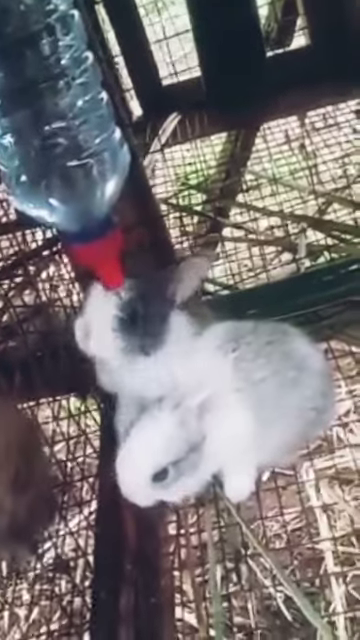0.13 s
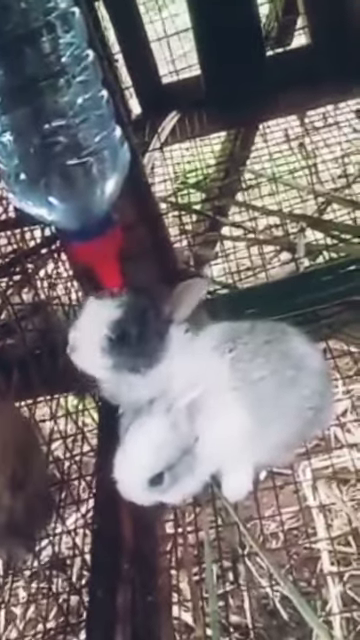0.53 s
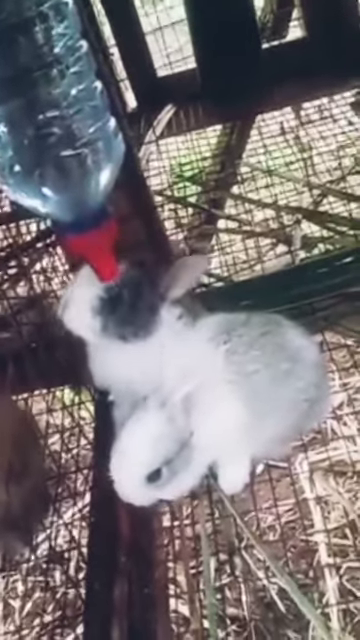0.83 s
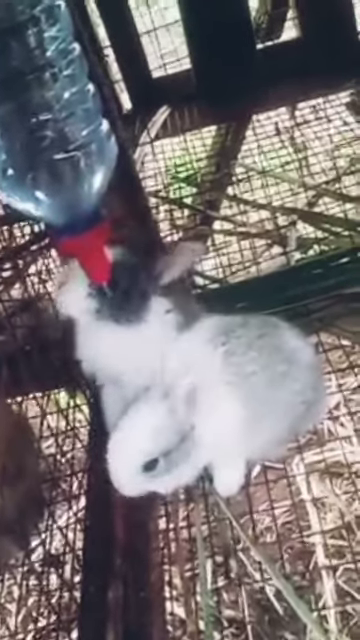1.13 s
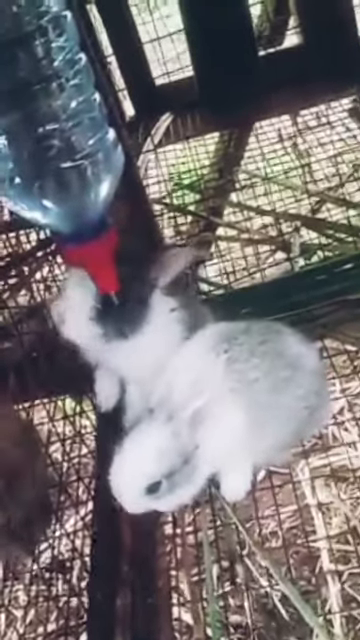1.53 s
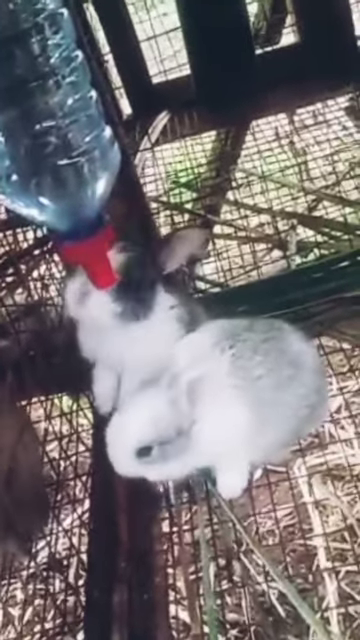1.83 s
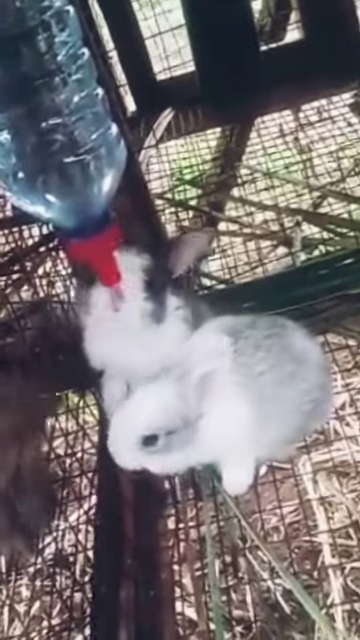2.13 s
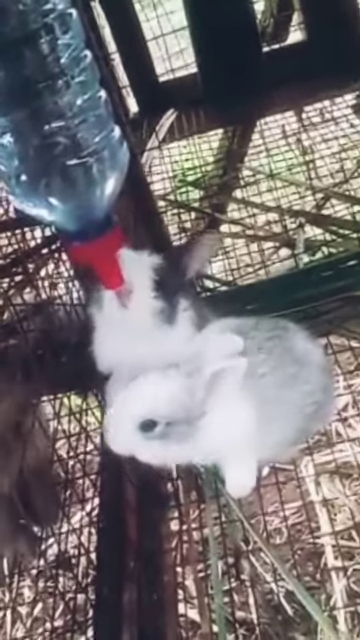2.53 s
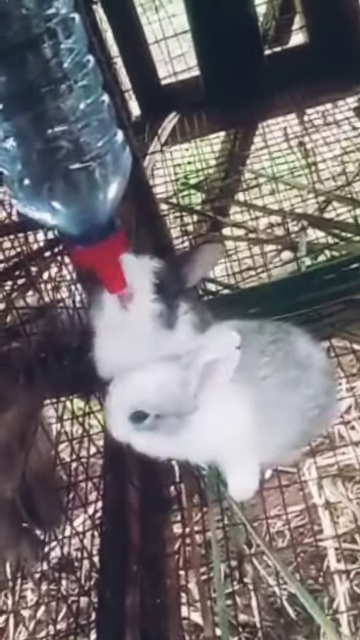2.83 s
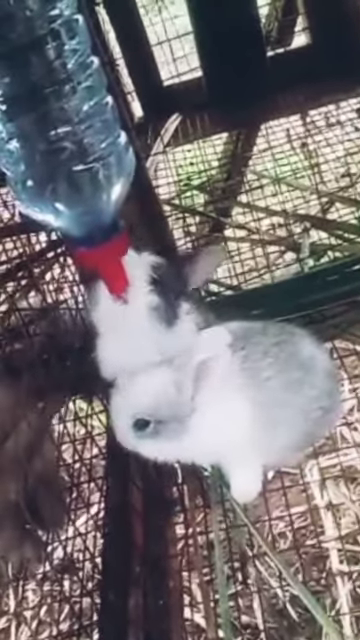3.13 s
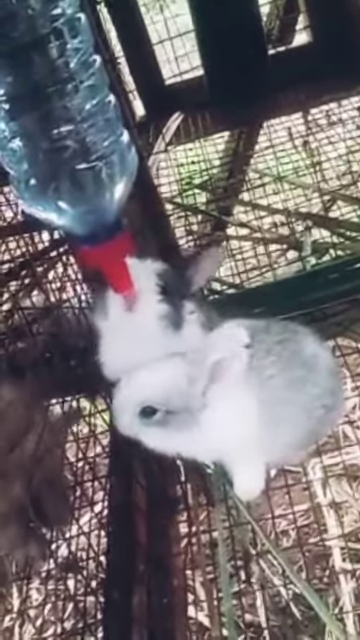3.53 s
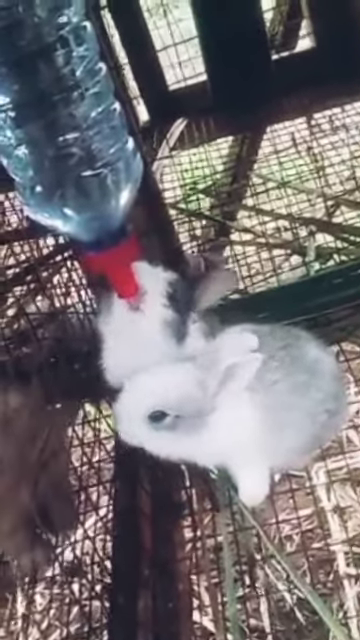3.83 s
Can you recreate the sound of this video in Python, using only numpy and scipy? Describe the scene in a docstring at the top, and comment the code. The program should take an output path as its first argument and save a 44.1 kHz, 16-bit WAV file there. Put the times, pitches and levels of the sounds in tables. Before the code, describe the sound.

A water bottle's metal ball valve clicks and rattles from start to finish as a rabbit licks it about five times a second, close by in a hutch. Each lick carries a soft wet smack and a slight plastic bottle ring. Faint gurgles cluster between 0.5 and 1.7 seconds, and tiny bubbles pop from about 2.3 seconds. A very faint low hum and outdoor air lie underneath.

```python
"""Rabbits at a water bottle

Young rabbits lick the metal nozzle of a water bottle in a wire hutch, about five licks a second.
The ball valve clicks and rattles in its tube, the wet tongue crackles and smacks, air gurgles into
the neck and the plastic bottle rings softly. Behind it lie a low electric hum and faint outdoor air."""
import sys
import numpy as np
from scipy import signal
from scipy.fft import rfft, irfft
from scipy.io import wavfile

SR = 44100
rng = np.random.default_rng(int(sys.argv[2]) if len(sys.argv) > 2 else 0)


def unload_wav(signal):
    """Save mono or channel-first audio to the path in sys.argv[1] as 16-bit WAV at rate SR, clipped to [-1, 1]."""
    wavfile.write(
        sys.argv[1],
        SR,
        np.round(np.clip(np.atleast_2d(signal).T, -1, 1) * 32767).astype(np.int16),
    )


N = 176400
HIT_GAIN = np.sqrt(.002 * SR)  # gives a unit-energy hit the energy of 2 ms at full level


def undb(db):
    """Decibels to gain."""
    return 10 ** (np.asarray(db) / 20)


def unit(x):
    """Scale a response to unit energy."""
    return x / np.sqrt(np.sum(x ** 2))


def through(x, response):
    """Play a sound through a response."""
    return signal.fftconvolve(x, response)[:N]


def add(out, s, sound):
    """Mix a sound in at s seconds."""
    i = int(np.clip(s * SR, 0, N - 1))
    out[i:i + len(sound)] += sound[:N - i]


def swell(s, rise, fall):
    """Envelope that builds to a peak at s seconds and dies away."""
    t = np.arange(N) / SR - s
    return np.exp(-np.where(t < 0, -t / rise, t / fall) ** 1.185)


def colour(eq, shift=1, size=512):
    """Response of an EQ curve, its pitch scaled by shift, with the lows rolled off."""
    hz, db = np.array(eq).T
    f = np.maximum(np.arange(size // 2 + 1), .5) * SR / size
    gain = undb(np.interp(np.log(f), np.log(hz * shift), db))
    low_cut = np.minimum(f / hz[0], 1) ** 2
    cepstrum = irfft(np.log(gain * low_cut))
    cepstrum[1:size // 2] *= 2  # minimum phase keeps the attack sharp
    cepstrum[size // 2 + 1:] = 0
    return unit(irfft(np.exp(rfft(cepstrum))))


def varied(eq, detune=.015, treble_db=3, timbre_db=1.5):
    """One contact's response: pitch, brightness and the balance of resonances all scatter."""
    hz, db = np.array(eq).T
    treble = (hz > 10000) * treble_db * rng.uniform(-1, 1)
    db = db + treble + timbre_db * rng.standard_normal(len(db))
    return colour(np.column_stack([hz, db]), shift=np.exp(detune * rng.standard_normal()))


def crackle(envelope, eq, per_s, spread_db, detune=.015, colours=6):
    """Random tiny impacts of uneven size and colour under an envelope."""
    size = undb(spread_db * np.minimum(rng.exponential(size=N), 2.5))
    hits = (rng.random(N) < per_s / SR) * rng.choice([-1, 1], N) * size
    hits = envelope * hits / np.std(hits)
    kind = rng.integers(colours, size=N)
    return sum(through(hits * (kind == k), varied(eq, detune)) for k in range(colours))


# Partials of the electric hum (frequency [Hz], level [dB])
HUM_PARTIALS = [(59.4,-61),(119.6,-71.5),(178.5,-82.5)]
# Dark tone of the outdoor air (frequency [Hz], gain [dB])
AIR_EQ = [(36,9),(60,1.5),(105,4.5),(160,-2),(300,-8),(600,-5.5),(800,-8.5),(1150,-6.5),(2000,-13.5),(4500,-21),(8700,-23),(16000,-30)]
def background(air_db=-64):
    """The bed: a low electric hum, wavering slightly in pitch, in soft outdoor air."""
    t = np.arange(N) / SR
    waver = np.interp(t, np.linspace(0, t[-1], 16), rng.standard_normal(16))
    clock = np.cumsum(1 + 0.0058 * waver) / SR
    hum = sum(undb(db) * np.sqrt(2) * np.sin(2 * np.pi * (hz * clock + rng.random()))
              for hz, db in HUM_PARTIALS)
    return hum + undb(air_db) * through(rng.standard_normal(N), colour(AIR_EQ, size=8192))


def hutch(x):
    """Quick reflections from bottle and boards, then a faint longer tail."""
    t = np.arange(SR // 3) / SR
    tail = lambda t60: unit(rng.standard_normal(len(t)) * (t > .001) * undb(-60 * t / t60))
    return x + through(x, undb(-11) * tail(t60=.028) + undb(-27) * tail(t60=.28))


# Soft body bumps (time [s], level [dB])
BUMP_CUES = [(.30,-58),(1.345,-60.5),(3.618,-54.5)]
# Muffled tone of a bump (frequency [Hz], gain [dB])
BUMP_EQ = [(170,-3.5),(280,3.5),(450,-17),(1000,-9.5),(4000,-45)]
def bumps():
    """A dull bump now and then as a rabbit shifts its weight."""
    push = sum(undb(db) * swell(s, rise=0.017, fall=0.014) for s, db in BUMP_CUES)
    return through(push * rng.standard_normal(N), colour(BUMP_EQ))


# Small mouth ticks (time [s], level [dB])
TICK_CUES = [(.042,-58),(.24,-59.5),(.847,-56),(.952,-50.5),(1.071,-56.5),(1.266,-57),(1.479,-59),(1.695,-58.5),(1.911,-60),(3.535,-59)]
# Dry tone of a tick (frequency [Hz], gain [dB])
TICK_EQ = [(300,-28),(900,-9.5),(1900,-7.5),(3500,-16.5),(6000,-12.5),(9000,-9),(13000,-10),(16000,-13)]
def mouth_ticks(trim_db=16, stray_count=30):
    """Single dry ticks as the mouth opens and closes, and fainter ones at random."""
    out = np.zeros(N)
    strays = [(when * N / SR, -70 + 6 * size) for when, size in rng.random((stray_count, 2))]
    for s, db in list(TICK_CUES) + strays:
        add(out, s, undb(db + trim_db) * HIT_GAIN * varied(TICK_EQ))
    return out


def bubble(db, hz, cycles=4.2, glide=0.019):
    """A bubble rings for a few cycles and rises a little in pitch."""
    age = np.arange(SR // 40) / SR * hz / cycles
    phase = 2 * np.pi * np.cumsum(hz * (1 + glide * np.tanh(age - 1))) / SR
    return undb(db) * 2 * age * np.exp(1 - 2 * age) * np.sin(phase)


GURGLE_SPREAD_S = .011
# Gulps of air entering the bottle (time [s], level [dB], centre pitch [Hz])
GURGLE_CUES = [(0.061,-60,1480),(0.498,-56.5,960),(0.595,-51,1090),(0.674,-51.5,1330),(.798,-54,1170),(0.996,-52,1194),(1.108,-49,1350),
               (1.439,-55,1150),(1.638,-52.5,1380),(2.757,-47,1150),(3.515,-50.5,1500)]
def gurgles(count=7, octaves=.26):
    """Air slips into the neck as a quick cluster of bubbles of unequal size."""
    out = np.zeros(N)
    for s, db, hz in GURGLE_CUES:
        for when, pitch in rng.uniform(-1, 1, (count, 2)):
            add(out, s + GURGLE_SPREAD_S * when, bubble(db, hz * 2 ** (octaves * pitch), cycles=4.5))
    return out


LICK_FALL_S, BRUSH_RISE_S = 0.015, 0.0051
# Full licks, which also drive the squelch, the bottle and the rattle
# (peak time [s], rise [s], rattle level [dB], tongue level [dB], bottle level [dB])
LICK_CUES = [(0.127,0.023,-46,-51.5,-47.5),(0.34,0.042,-50.5,-55,-74),(0.526,0.014,-43,-49.5,-66),(0.721,0.014,-39.5,-49,-38),(0.925,0.0066,-36.5,-51.5,-38),
             (1.14,0.015,-39,-47.5,-36),(1.368,0.03,-45.5,-53,-42),(1.577,0.01,-44.5,-50,-42.5),(1.777,0.016,-42.5,-49.5,-38.5),(1.956,0.007,-42,-48.5,-47),
             (2.139,0.024,-41,-58,-44),(2.333,0.02,-42.5,-50.5,-42),(2.54,0.015,-35.5,-48.5,-39),(2.752,0.021,-41,-47,-38),(2.959,0.024,-36.5,-50.5,-36.5),
             (3.161,0.0049,-33,-49,-68.5),(3.38,0.018,-39.5,-51,-41.5),(3.645,0.029,-40,-52,-40.5),(3.842,0.015,-40,-49,-59),(3.868,0.004,-45,-59,-46)]
# Light brushes of the tongue that shake the ball between licks (time [s], level [dB])
BRUSH_CUES = [(0.065,-50),(0.189,-51),(0.306,-55),(0.389,-48.5),(0.421,-51),(0.595,-50),(0.671,-51),
              (0.793,-46),(0.885,-51),(0.987,-54),(1.006,-48),(1.294,-44),(1.346,-42.5),(1.428,-52),
              (1.505,-44),(1.558,-44.5),(1.628,-56),(1.72,-49),(1.915,-56.5),(1.932,-50),
              (2.488,-45),(2.693,-46),(2.731,-42),(2.807,-57),(2.903,-41),(3.325,-48),(3.605,-48.5),(3.789,-43.5)]
# Wet tone of the tongue (frequency [Hz], gain [dB])
TONGUE_EQ = [(450,-2.5),(800,-6.5),(1800,-3.5),(2800,6.5),(3500,-14),(4300,7.5),(9000,-2.5)]
def tongue():
    """Wet crackle in each lick, brush and gurgle; resonances scatter as the mouth changes shape."""
    wet = sum(undb(db + 4.5) * swell(s, rise, LICK_FALL_S) for s, rise, _, db, _ in LICK_CUES)
    smack = sum(undb(db - 6.5) * swell(s, BRUSH_RISE_S, LICK_FALL_S) for s, db in BRUSH_CUES)
    froth = sum(undb(db - 9.5) * swell(s, GURGLE_SPREAD_S, GURGLE_SPREAD_S) for s, db, _ in GURGLE_CUES)
    envelope = np.sqrt(wet ** 2 + smack ** 2 + froth ** 2)
    return crackle(envelope, TONGUE_EQ, per_s=900, spread_db=-0.5, detune=.2, colours=12)


# Tiny bubbles bursting at the lips and in the neck (time [s], level [dB], pitch [Hz])
BUBBLE_CUES = [(2.322,-36,3940),(2.694,-36,3200),(2.733,-32,4380),(3.146,-34,3480),(3.833,-33,2600)]
def bubbles(per_lick=7, squelch_hz=3116, octaves=0.54):
    """Clear single bubbles, and a squelch of fainter ones in every lick."""
    out = np.zeros(N)
    for s, db, hz in BUBBLE_CUES:
        add(out, s, bubble(db - 2, hz))
    for s, rise, _, db, _ in LICK_CUES:
        for when, pitch in rng.uniform(-1, 1, (per_lick, 2)):
            add(out, s + rise * (when - .5), bubble(db - 5, squelch_hz * 2 ** (octaves * pitch)))
    return out


# Modes of the plastic bottle (frequency [Hz], level [dB], time to fall 60 dB [s])
BOTTLE_MODES = [(556,-36,0.29),(571,-2.5,0.077),(665.4,-1.5,0.18),(959,0.5,0.12),(1146.7,12.5,0.069),(1210,-13,0.42),(1470,-3.5,0.079)]
def bottle_ring(slosh=.025):
    """One ring of the bottle; the moving water detunes every mode a little."""
    t = np.arange(SR // 4) / SR
    detunes = 1 + slosh * rng.standard_normal(len(BOTTLE_MODES))
    return unit(sum(undb(db) * unit(np.sin(2 * np.pi * hz * detune * t) * undb(-60 * t / t60))
                    for (hz, db, t60), detune in zip(BOTTLE_MODES, detunes)))


def bottle(valve):
    """Each lick and each shake of the valve rings the bottle, as strongly as it is pushed."""
    noise = rng.standard_normal(N)
    licks = [undb(db - 10) * swell(s, rise, LICK_FALL_S) for s, rise, _, _, db in LICK_CUES]
    shake = undb(-21.5) * np.abs(valve)
    return sum(np.linalg.norm(push) * unit(through(push * noise, bottle_ring()))
               for push in licks + [shake])


# Snaps of the ball (time [s], level [dB])
SNAP_CUES = [(0.2841,-25),(0.4928,-27),(.6966,-26.5),(0.9613,-31),(1.0698,-39),(1.11,-36),(1.5219,-24.5),(1.5519,-25.5),(1.7392,-26.5),
             (2.7723,-30.5),(2.9197,-30),(3.1273,-29.5),(3.1463,-30.5),(3.3512,-38),(3.581,-29.5),(3.8087,-29)]
# Thin, bright tone of a snap (frequency [Hz], gain [dB])
SNAP_EQ = [(3500,-18),(7800,0.5),(8700,9.5),(10200,-9.5),(11100,4),(14300,1),(15800,-12)]
def valve_snaps():
    """Between the first touch and the full push, the ball gives a thin, bright snap."""
    out = np.zeros(N)
    for s, db in SNAP_CUES:
        add(out, s, undb(db) * HIT_GAIN * varied(SNAP_EQ))
    return out


# Metallic ring of the nozzle tube, for rattle and clicks (frequency [Hz], gain [dB])
NOZZLE_EQ = [(1000,-28.5),(2000,-24),(4000,-19),(5000,-28.5),(6000,-16.5),(6800,-8),(7900,-7.5),(8600,2),(9400,-4.5),(10300,-15),(11300,-15),(12700,-17),(13700,-14),(15100,-22),(15800,-52)]
def valve_rattle():
    """The tongue rolls the ball: a crowd of small clicks in the tube."""
    push = sum(undb(db + 2.5) * swell(s, rise, LICK_FALL_S) for s, rise, db, _, _ in LICK_CUES)
    brush = sum(undb(db + 15) * swell(s, BRUSH_RISE_S, fall=0.0042) for s, db in BRUSH_CUES)
    return crackle(np.hypot(push, brush), NOZZLE_EQ, per_s=650, spread_db=5)


# Single hits of the ball in the tube (time [s], level [dB])
CLICK_CUES = [(0.0223, -29), (0.061, -25), (0.116, -29.5), (0.1206, -18.5), (0.1351, -30.5), (0.184, -39),
              (0.2601, -22), (0.336, -18), (0.4161, -35), (0.468, -21.5), (0.521, -18.5), (0.5918, -35),
              (0.6698, -27.5), (0.7167, -23.5), (0.802, -31.5), (0.881, -24), (0.9081, -28.5),
              (0.9192, -25), (1.089, -26.5), (1.128, -27), (1.1342, -18.5), (1.1955, -26.5), (1.29, -24.5),
              (1.3089, -20), (1.3462, -27), (1.3514, -36), (1.3679, -21.5), (1.419, -39), (1.4352, -34),
              (1.5017, -26.5), (1.58, -25.5), (1.63, -45), (1.6473, -29.5), (1.7185, -27), (1.777, -18),
              (1.827, -31.5), (1.9529, -24), (1.9611, -19.5), (2.1372, -26), (2.2863, -23.5), (2.322, -26),
              (2.3361, -25.5), (2.3426, -27), (2.4867, -27), (2.5199, -21.5), (2.5398, -20), (2.5892, -33),
              (2.6897, -23.5), (2.7224, -29), (2.7524, -24.5), (2.808, -25), (2.899, -29), (2.9459, -28),
              (2.9553, -34), (3.162, -21), (3.3278, -28), (3.3619, -28), (3.6418, -25.5), (3.786, -24.5),
              (3.8368, -21.5), (3.8399, -25.5), (3.8645, -21), (3.8749, -27.5), (3.904, -35.5)]
def valve_clicks(trim_db=-1.5, scrape_db=4.5, scrape_rise_s=0.000406):
    """The ball scrapes onto its seat, strikes it and rings the tube."""
    out = np.zeros(N)
    age = np.arange(SR // 300) / SR / scrape_rise_s
    thin_eq = [(hz, db - 5.5 * (hz < 5500)) for hz, db in NOZZLE_EQ]  # less body than the rattle
    for s, db in CLICK_CUES:
        contact = undb(scrape_db) * unit(rng.standard_normal(len(age)) * age ** 2 * np.exp(-2 * age))
        contact[np.argmax(age > 1)] += 1  # the strike lands at the peak of the scrape
        click = unit(np.convolve(contact, varied(thin_eq)))
        add(out, s, undb(db + trim_db) * HIT_GAIN * click)
    return out


def scene():
    """Mono mix: valve, mouth and water in the hutch, over bottle ring, bumps and the bed."""
    valve = valve_clicks() + valve_snaps() + valve_rattle()
    drinking = valve + tongue() + mouth_ticks() + bubbles() + gurgles()
    return (hutch(drinking) + bottle(valve) + bumps() + background())[None]


def record(dry):
    """A steep low-pass at 16.2 kHz takes off the very top."""
    return signal.sosfilt(signal.ellip(8, .2, 70, 16200, fs=SR, output="sos"), dry)


dry = scene()
out = record(dry)
unload_wav(out)
```